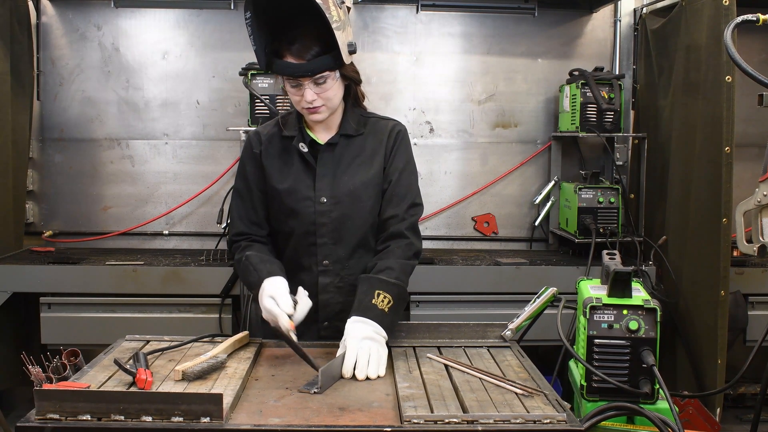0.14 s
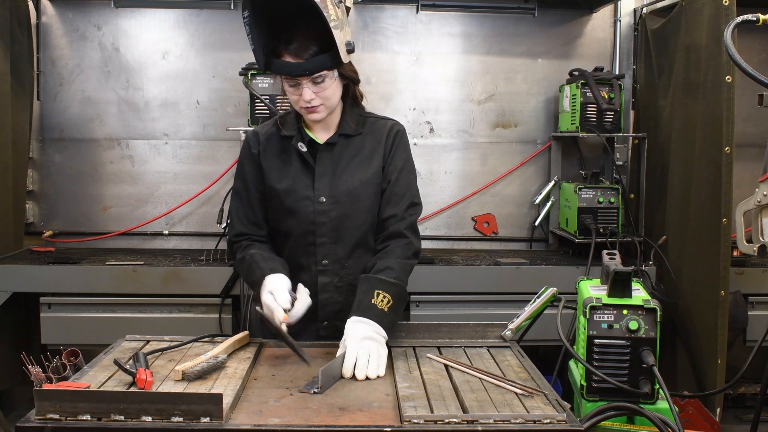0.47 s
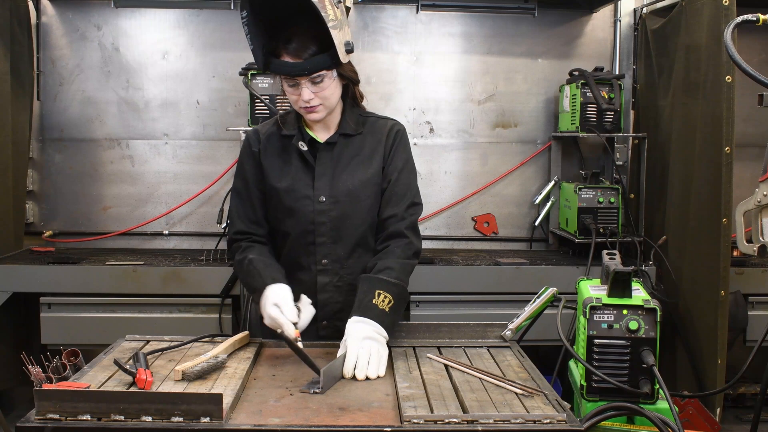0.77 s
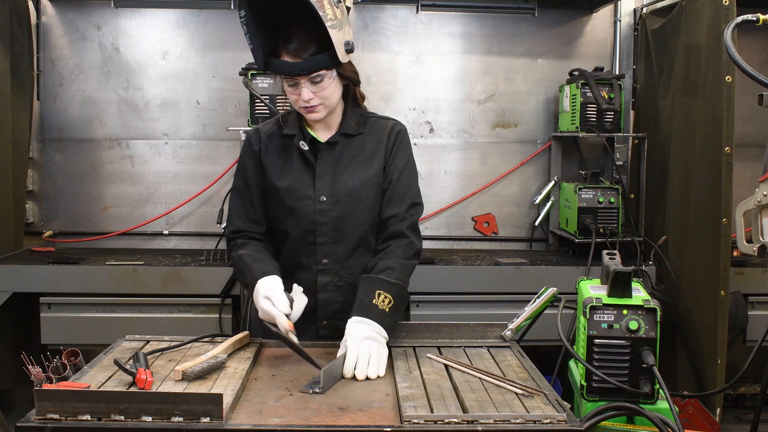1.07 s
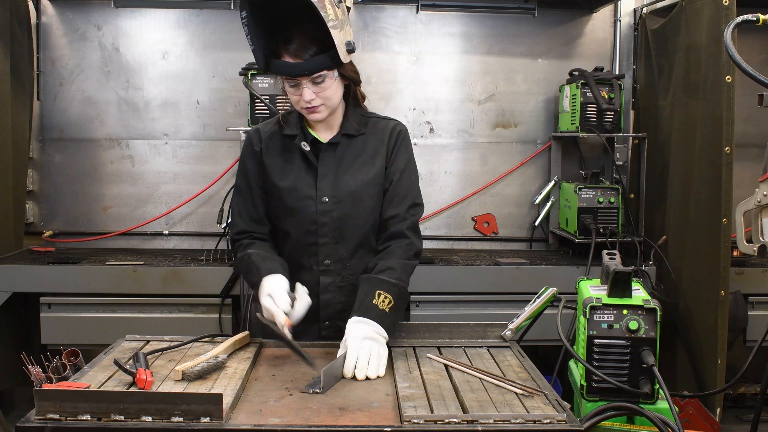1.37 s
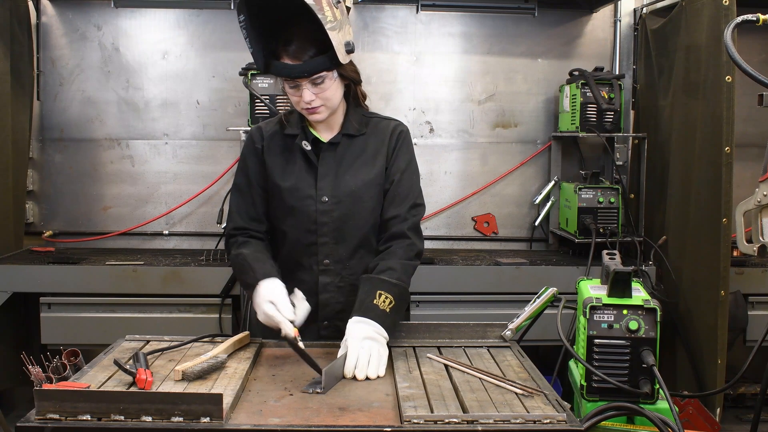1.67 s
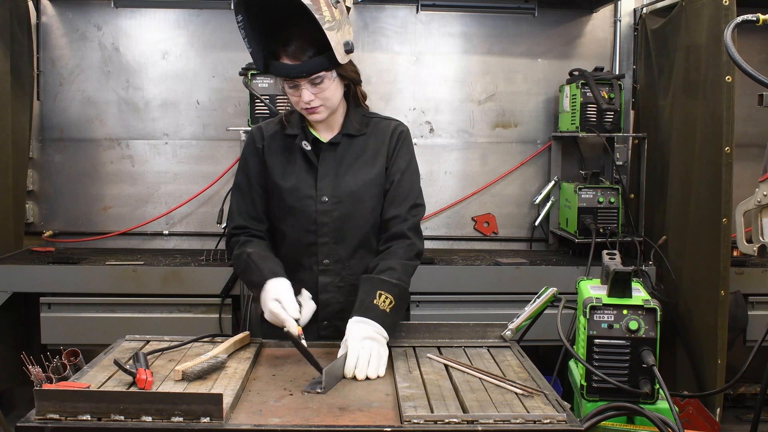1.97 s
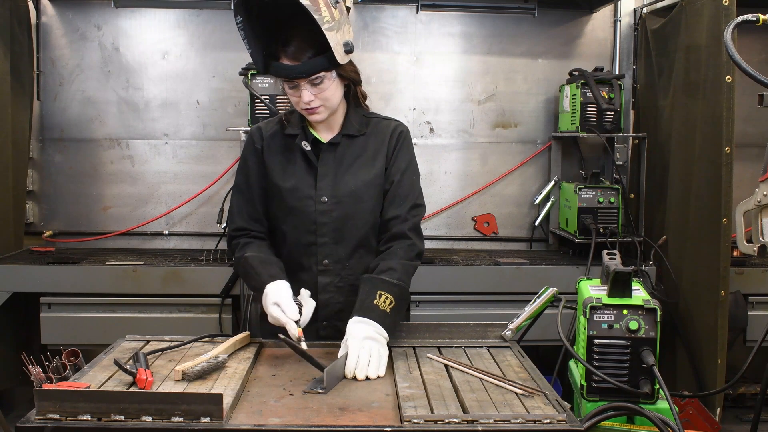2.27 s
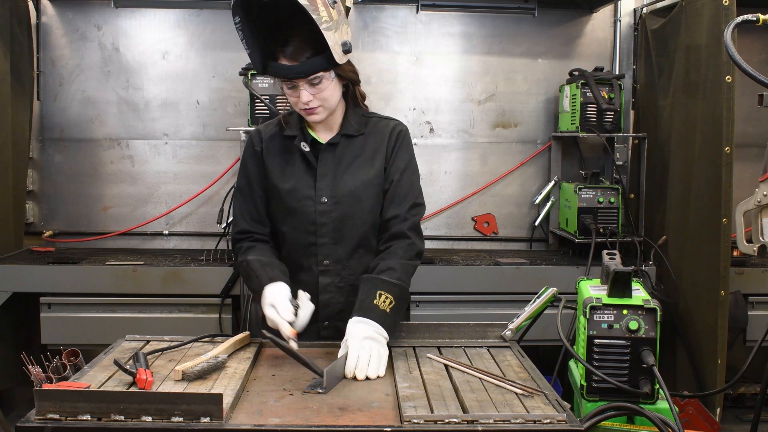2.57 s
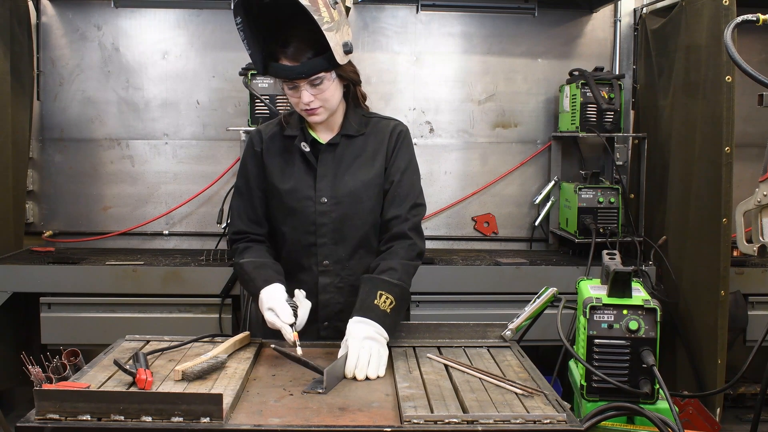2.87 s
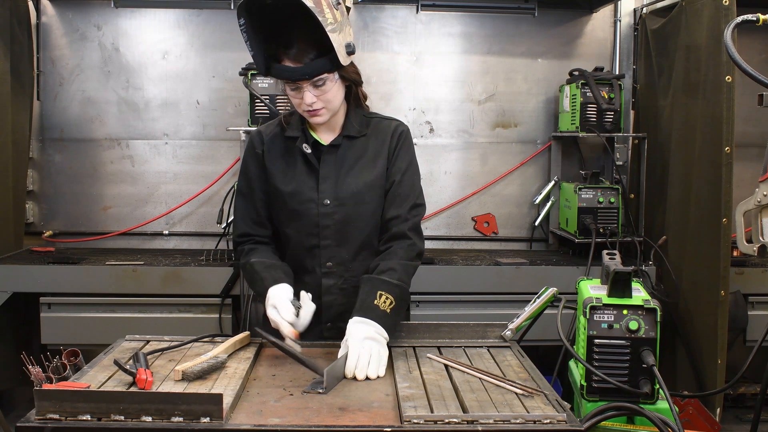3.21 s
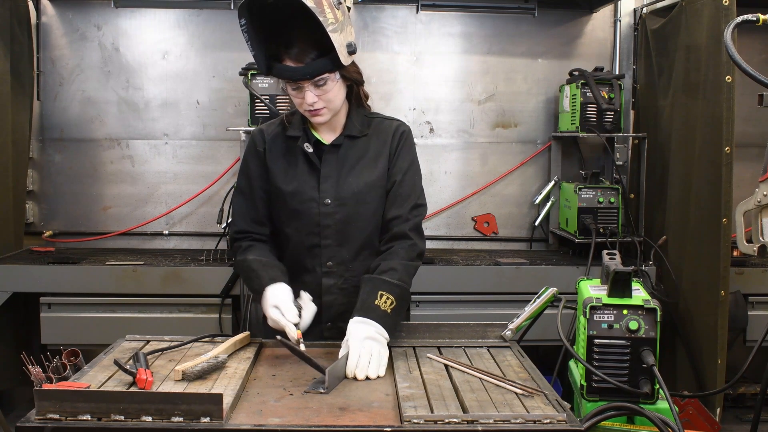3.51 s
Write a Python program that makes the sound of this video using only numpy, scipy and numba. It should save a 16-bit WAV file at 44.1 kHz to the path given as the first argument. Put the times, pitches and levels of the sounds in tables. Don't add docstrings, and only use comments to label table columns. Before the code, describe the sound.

Hammer blows on a welded steel plate, about four a second, clanging in a hard booth

```python
import sys
import numpy as np
from scipy import signal
from scipy.fft import rfft, irfft, next_fast_len
from scipy.io import wavfile
from scipy.ndimage import uniform_filter1d, minimum_filter1d
from numba import njit

SR = 44100
rng = np.random.default_rng(int(sys.argv[2]) if len(sys.argv) > 2 else 0)


def put_to_file(sound):
    columns = np.atleast_2d(sound).T
    safe = np.clip(columns, -1, 1)
    whole_steps = np.round(safe * 32767)
    wavfile.write(sys.argv[1], SR, whole_steps.astype(np.int16))


def gain_from_decibels(decibels):
    exponent = np.asarray(decibels, float) / 20
    return 10 ** exponent


N = 160965

# [f/Hz, level/dB per Hz]
SHOP_AIR = [(40, -33), (110, -32), (300, 7), (600, 2), (1500, -0.5), (4000, -10.5), (9000, -24),
            (12000, -40)]
# [t/s, level/dB]
FRAME_SWAY = [
    (0, -53),
    (.5, -29),
    (1.2, -38),
    (1.9, -29),
    (2.45, -32),
    (2.8, -55),
    (3.3, -57),
    (3.65, -54),
]
# [t/s, force/dB, bench/dB, ring/dB, tilt/dB per octave]
BLOWS = [(0.155, 3.5, 1.5, 3, 2), (0.408, -3.5, 5, -27, 2), (0.645, -10.5, 7, -34, 1),
         (0.866, -3, 1, -3.5, 0.5), (1.087, -11.5, -1, -2, 0), (1.311, -11, 7.5, -2, 0.5),
         (1.533, -3.5, 7, -10.5, 0.5), (1.753, 6.5, -1.5, 2, 0.5), (2.052, 9.5, -5, -14, 1),
         (2.305, 10, 1, 1, 1.5), (2.708, -11, -16.5, 0.5, 0.5), (3.349, -10.5, 3.5, -2.5, -1),
         (3.587, -18.5, 8.5, -5, -1)]
# [t/s, force/dB, bench/dB, ring/dB, tilt/dB per octave]
ROCKING = [
    (-.31, -23.5, 0, 0, -13),
    (-.08, -9, -9, -1.5, 0.5),
    (2.776, -23, -5, -13, -1),
    (2.793, -17.5, 6, -8, -1),
    (2.808, -15.5, 6.5, -2, -2.5),
    (2.817, -18.5, -2.5, 1.5, 1.5),
    (2.829, -16.5, 1.5, -19, -2),
    (2.847, -38, -6, -10, -3),
    (2.874, -37.5, 23.5, -7, 0),
    (3.068, -39.5, -6, -4, -3.5),
]
# [f/Hz, level/dB, t60/s]
HAMMER_MODES = [(2387, -7, 0.16), (2380, -9, 0.16), (2280, -0.5, 0.074), (2380, -18, .1),
                (2520, -10.5, 0.13), (3130, -19, 0.3), (3170, -4, 0.11), (3750, -10, 0.18),
                (4430, -48, 0.067), (5060, -9.5, 0.079), (5500, -14, .06), (5630, -7, 0.057),
                (2070, -13.5, 0.085), (9400, -19.5, 0.35)]
# [t/s, level/dB, centre f/Hz, t60/s]
SLAG_CRACKS = [(.155, -8, 2950, .06), (.409, -6, 5600, 0.089), (.646, -18, 4910, 0.055),
               (0.865, -10, 5620, .05), (1.09, -10, 2944, .08), (1.311, -13, 4850, .05),
               (1.534, -6, 5440, .05), (1.753, -4, 5770, 0.054), (2.051, 8, 5850, 0.12),
               (2.305, 4, 5450, .08), (2.709, -11.5, 1446, 0.28), (3.348, -20, 3750, .06)]
# [f/Hz, level/dB, t60/s]
BENCH_MODES = [(130.8, -11, 0.44), (171.6, -9.5, 0.17), (188.8, -11.5, 0.53), (237, -5, 0.19),
               (255, -6, 0.32), (278.7, -4, 0.36), (301.8, -3.5, 0.37), (327, 1, 0.14), (344.3, 4, 0.33),
               (369.6, 3, 0.13), (839.5, 6, 0.097), (1313, 8.5, 0.14), (1293, -17, 0.6), (967, -23, 0.45)]
# [f/Hz, level/dB per Hz]
CRASH_COLOUR = [(100, -42), (200, -8), (400, -5.5), (800, -7.5), (1600, -9.5), (3000, -14), (5500, -16),
                (9000, -23.5)]
# [f/Hz, t60/s]
BOOTH_T60 = [(100, 0.93), (300, 0.56), (1000, 0.63), (3000, 0.51), (8000, 0.34), (15000, 0.24)]
# [f/Hz, level/dB, t60/s]
EDGE_MODES = [(8100, -2, 0.11), (8200, 4, 0.11), (8600, -7, 0.054), (9180, 5.5, 0.084), (10000, 1, .04),
              (10900, 7, .025)]
# [t/s, level/dB]
EDGE_TICKS = [
    (2.708, -22.5),
    (2.728, -33),
    (2.829, -30.5),
    (2.848, -32),
    (2.871, -43),
    (3.068, -56),
    (3.348, -28),
]
# [f/Hz, level/dB]
MIC_COLOUR = [(30, -32), (70, -7.5), (110, -15.5), (150, 1.5), (9000, 1), (10500, -10), (13000, -21.5),
              (16000, -22)]
# [f/Hz, level/dB]
BOOTH_SIDE = [(100, -30.5), (250, -16.5), (500, -13), (1000, -4.5), (4000, 0), (12000, -0.5)]
# [f/Hz, level/dB]
LEFT_LEAN = [(100, 1), (500, -.2), (1500, -0.9), (4000, .3), (8000, -0.5), (14000, -7.5)]

AIR_DB = -38
FRAME_HZ, FRAME_DIP_DB, FRAME_DIP_S = 67, -5, 0.06
DRIVE_DB, SCATTER_DB = 9.5, 2.5
HAMMER_DB, CRACK_SPREAD = -7, 0.069
BENCH_DB, BENCH_PUSH_S = -5.5, 0.0031
CRASH_DB, CRASH_T60_S, CRASH_RISE_S, RISE_CYCLES = 14, 0.059, 0.0009, 1.8
GRIT_DB, BURST_SIDE_DB = 6, -11
TAIL_DB, TAIL_RISE_S = -5, 0.011
BOOTH_DB, BOOTH_RISE_S = 1, 0.0033
DIRECT_SIDE_DB, RING_WET_DB, EDGE_WET_DB = -34.5, -2.5, -5
CEILING_DB, RATIO, ATTACK_S, RELEASE_S, LOOKAHEAD_S = -4.5, 2.45, 0.0011, 0.18, 0.001
PEAK_DB, PEAK_HOLD_S = 1, 0.0026

LEAD = SR // 2
M = next_fast_len(N + SR)
HZ = np.maximum(np.arange(M // 2 + 1) * SR / M, 1)
HITS_S = np.vstack([BLOWS, ROCKING])[:, 0]


def curve(table, hz):
    t = np.array(table, float)
    return np.interp(np.log(hz), np.log(t[:, 0]), t[:, 1])


def unit(x):
    return x / np.sqrt(np.sum(x ** 2))


def bands():
    for hz in 45 * 2 ** np.arange(0, 9, 0.5):
        octaves = np.log2(HZ / hz)
        yield hz, np.cos(np.pi / 2 * np.clip(2 * octaves, -1, 1)) ** 2


def samples(times):
    return (times * SR).astype(int) + LEAD


def train(db, times=HITS_S):
    x = np.zeros(M)
    np.add.at(x, samples(times), gain_from_decibels(db))
    return x


def fade(x, seconds):
    pole = np.exp(-1 / (max(seconds, 1e-5) * SR))
    return signal.lfilter([1], [1, -pole], x)


def modes(table, db, times=HITS_S):
    chance = rng.standard_normal((len(db), len(table), 2))
    out = 0
    for k, (hz, mode_db, t60) in enumerate(table):
        r = np.exp(-np.log(1000) / (t60 * SR))
        w = 2 * np.pi * hz / SR
        x = train(db + mode_db + SCATTER_DB * chance[:, k, 0], times)
        x[samples(times)] *= np.sign(chance[:, k, 1])
        out = out + signal.lfilter([0, np.sin(w)], [1, -2 * r * np.cos(w), r * r], x)
    return out


def shop_air():
    air = rfft(rng.standard_normal((2, M))) * gain_from_decibels(curve(SHOP_AIR, HZ))
    return air * gain_from_decibels(AIR_DB) / np.std(irfft(air[0], M))


def frame_sway():
    t = (np.arange(M) - LEAD) / SR
    checked = fade(train(0, np.array(BLOWS)[:, 0]), FRAME_DIP_S)
    db = np.interp(t, *np.array(FRAME_SWAY).T) + FRAME_DIP_DB * checked
    return rfft(gain_from_decibels(db) * np.sin(2 * np.pi * FRAME_HZ * t))


def booth():
    t = np.arange(SR) / SR
    noise = rng.standard_normal((2, SR))
    out = np.zeros((2, M))
    for hz, window in bands():
        env = gain_from_decibels(-60 * t / curve(BOOTH_T60, hz)) * (1 - np.exp(-t / BOOTH_RISE_S))
        out = out + irfft(rfft(noise * unit(env), M) * window, M)
    return rfft(out) * gain_from_decibels(BOOTH_DB)


def hammer_clang(force_db, ring_db):
    return rfft(modes(HAMMER_MODES, force_db + ring_db + HAMMER_DB))


def bench_thud(force_db, bench_db):
    ringing = modes(BENCH_MODES, force_db + bench_db + BENCH_DB)
    return rfft(fade(ringing, BENCH_PUSH_S) / (BENCH_PUSH_S * SR))


def crash(force_db, tilt_db):
    grit = gain_from_decibels(GRIT_DB * np.repeat(rng.standard_normal(M // 32 + 1), 32)[:M])
    noise = rfft(rng.standard_normal((2, M))) * gain_from_decibels(curve(CRASH_COLOUR, HZ))
    out = 0
    for hz, window in bands():
        hit = train(force_db + tilt_db * np.log2(hz / 1500)) ** 2

        def power(t60, rise):
            return np.abs(fade(hit, t60 / np.log(1000) / 2) - fade(hit, rise + RISE_CYCLES / hz))

        burst = power(CRASH_T60_S, CRASH_RISE_S) * grit
        tail = power(curve(BOOTH_T60, hz), TAIL_RISE_S) * gain_from_decibels(2 * TAIL_DB)
        mid_side = np.sqrt([burst + tail, burst * gain_from_decibels(2 * BURST_SIDE_DB) + tail])
        out = out + irfft(noise * window, M) * mid_side
    return rfft(out) * gain_from_decibels(CRASH_DB)


def slag_cracks(count=6):
    out = 0
    for s, db, hz, t60 in SLAG_CRACKS:
        spread = 1 + CRACK_SPREAD * rng.standard_normal(count)
        partials = [(hz * x, -6, t60) for x in spread]
        out = out + modes(partials, np.array([db]), np.array([s]))
    return rfft(out)


def edge_ticks():
    times, db = np.array(EDGE_TICKS).T
    return rfft(modes(EDGE_MODES, db, times))


def microphone():
    cep = irfft(curve(MIC_COLOUR, HZ) * np.log(10) / 20, M)
    cep[1:M // 2] *= 2
    cep[M // 2 + 1:] = 0
    return np.exp(rfft(cep))


def scene():
    _, force, bench, ring, tilt = np.vstack([BLOWS, ROCKING]).T
    force = force + DRIVE_DB
    thud = bench_thud(force, bench)
    clang = hammer_clang(force, ring) + slag_cracks()
    tick = edge_ticks()
    direct = (thud + clang + tick) * np.array([[1], [gain_from_decibels(DIRECT_SIDE_DB)]])
    wet = (thud + clang * gain_from_decibels(RING_WET_DB) + tick * gain_from_decibels(EDGE_WET_DB)) * booth()
    blows = (direct + wet + crash(force, tilt)) * microphone()
    mid, side = blows + shop_air()
    mid = mid + frame_sway()
    side = side * gain_from_decibels(curve(BOOTH_SIDE, HZ))
    lean = gain_from_decibels(curve(LEFT_LEAN, HZ) / 2)
    left_right = np.array([(mid + side) * lean, (mid - side) / lean])
    return irfft(left_right, M)[:, LEAD:LEAD + N]


@njit
def follow(x, attack, release):
    e, out = x[0], np.empty(len(x))
    for i in range(len(x)):
        e += (x[i] - e) * (attack if x[i] > e else release)
        out[i] = e
    return out


def low_pass(x):
    return signal.sosfilt(signal.butter(12, 15640, fs=SR, output="sos"), x)


def record(dry):
    env = follow(np.abs(dry).max(axis=0), 1 / (ATTACK_S * SR), 1 / (RELEASE_S * SR))
    env = np.interp(np.arange(N) + LOOKAHEAD_S * SR, np.arange(N), env)
    squeezed = dry * np.minimum(1, gain_from_decibels(CEILING_DB) / (env + 1e-9)) ** (1 - 1 / RATIO)
    hold = int(PEAK_HOLD_S * SR) + 1
    room_left = np.minimum(1, gain_from_decibels(PEAK_DB) / (np.abs(squeezed).max(axis=0) + 1e-9))
    gain = uniform_filter1d(minimum_filter1d(room_left, hold), hold)
    return low_pass(squeezed * gain)


dry = scene()
out = record(dry)
put_to_file(out)
```